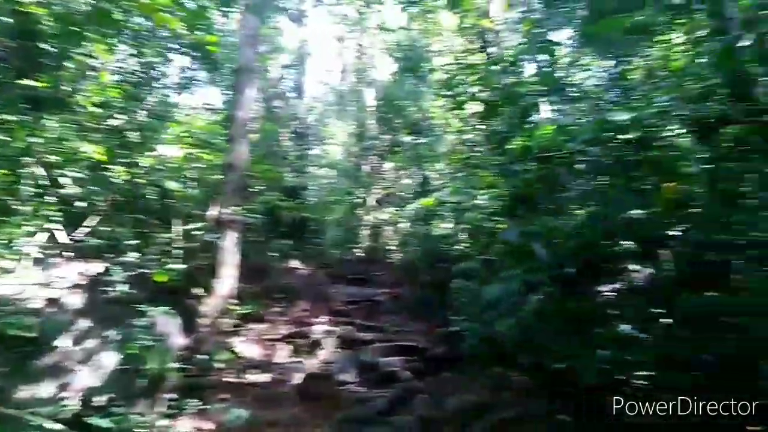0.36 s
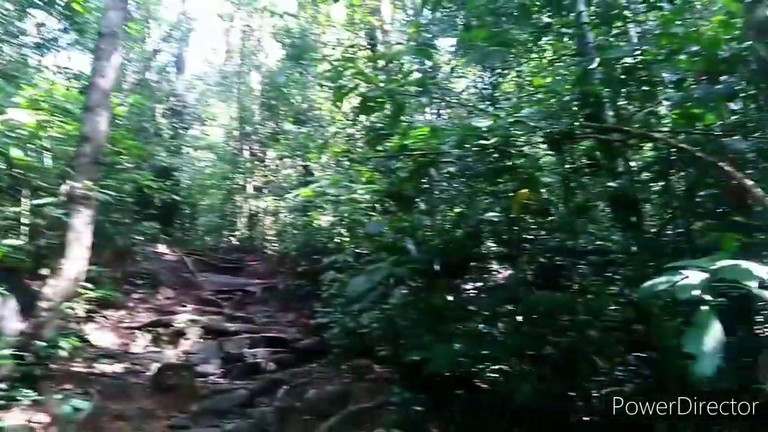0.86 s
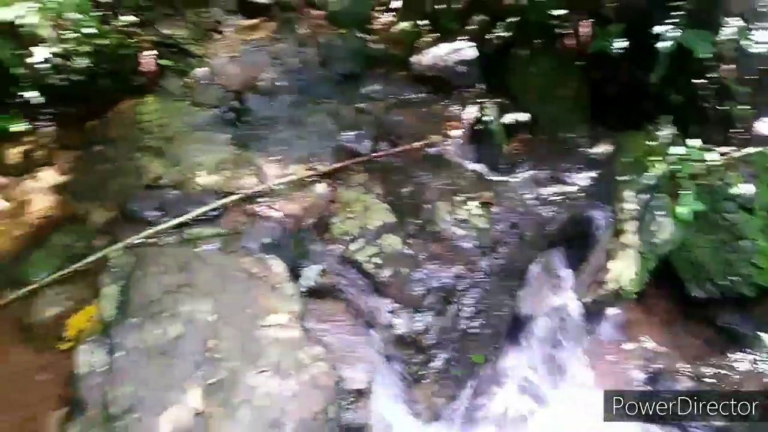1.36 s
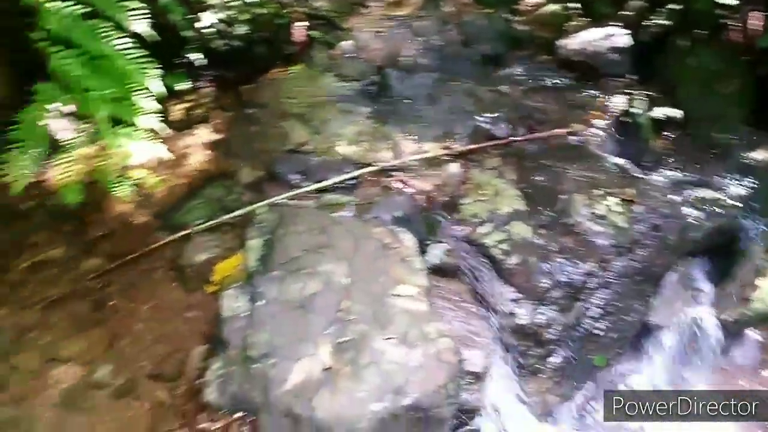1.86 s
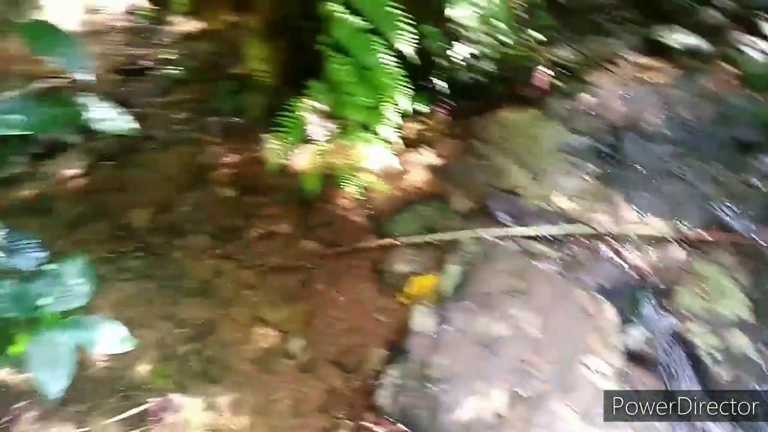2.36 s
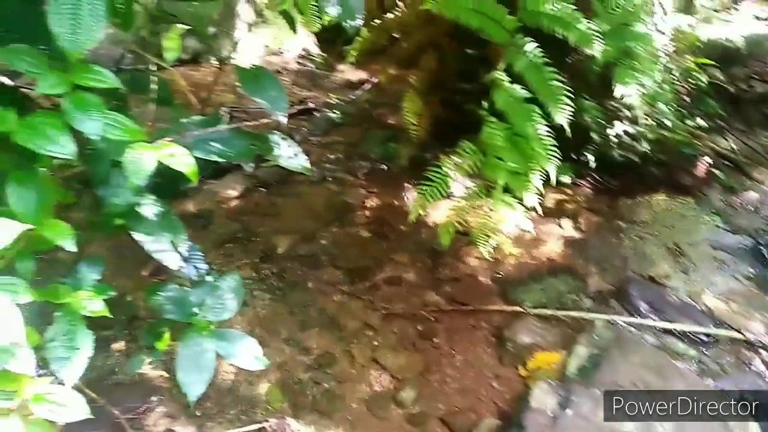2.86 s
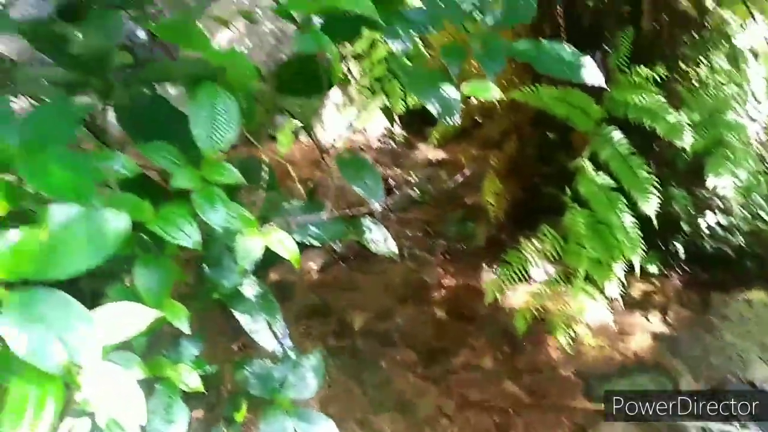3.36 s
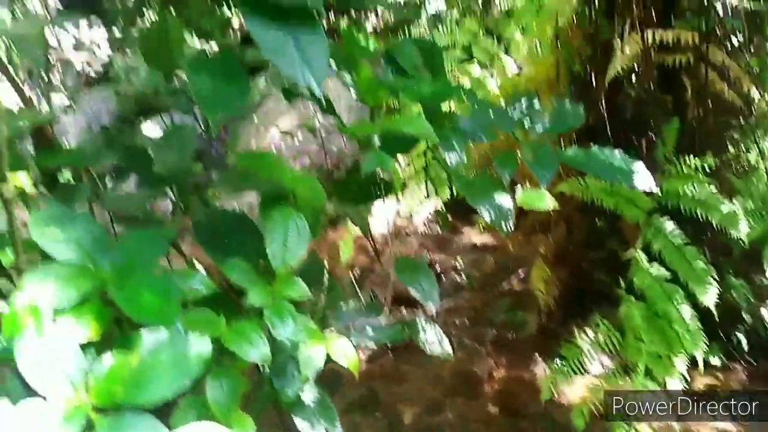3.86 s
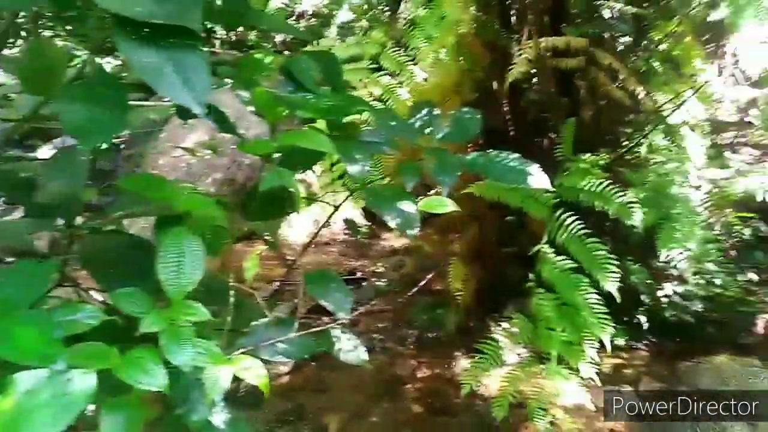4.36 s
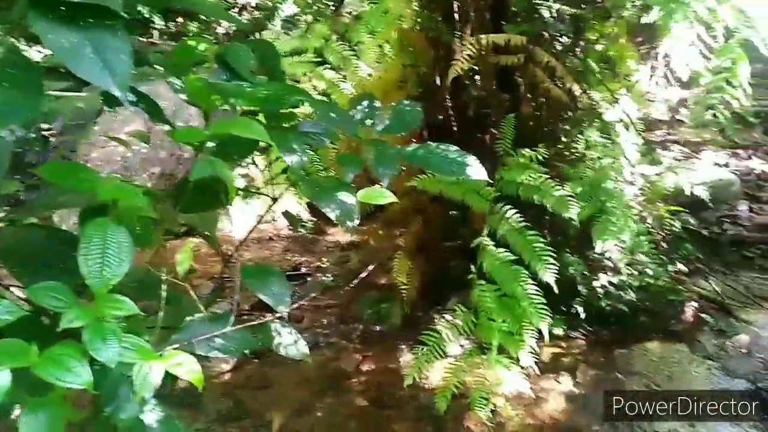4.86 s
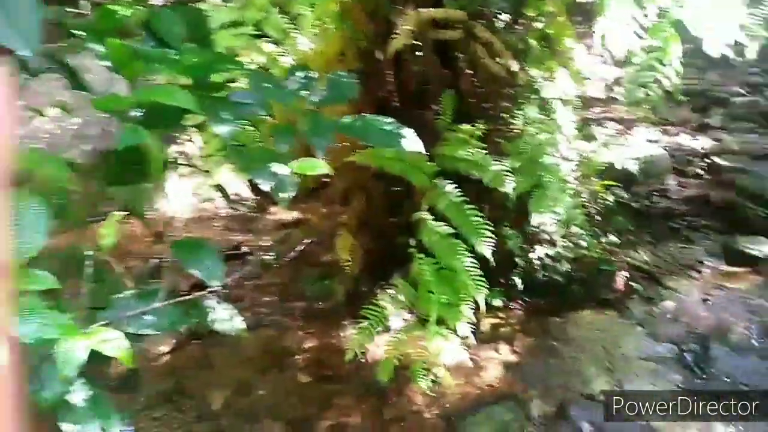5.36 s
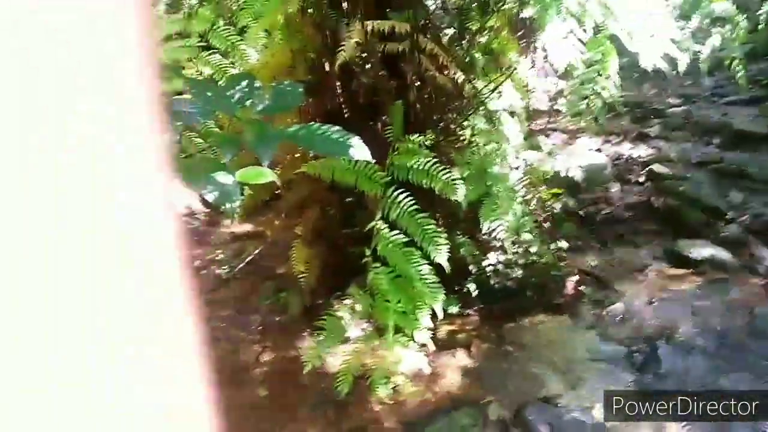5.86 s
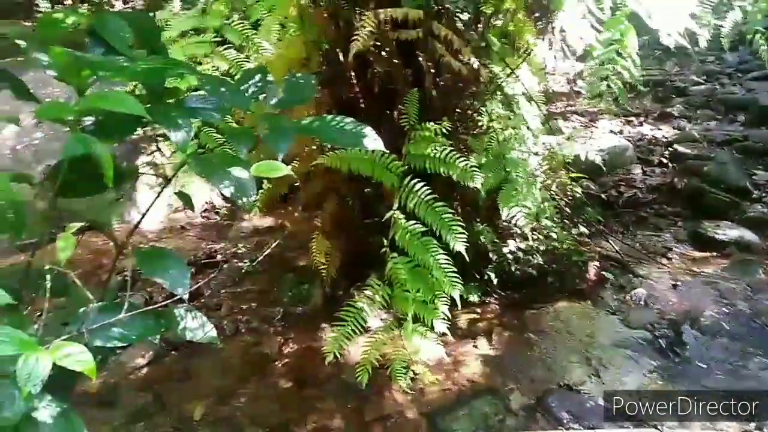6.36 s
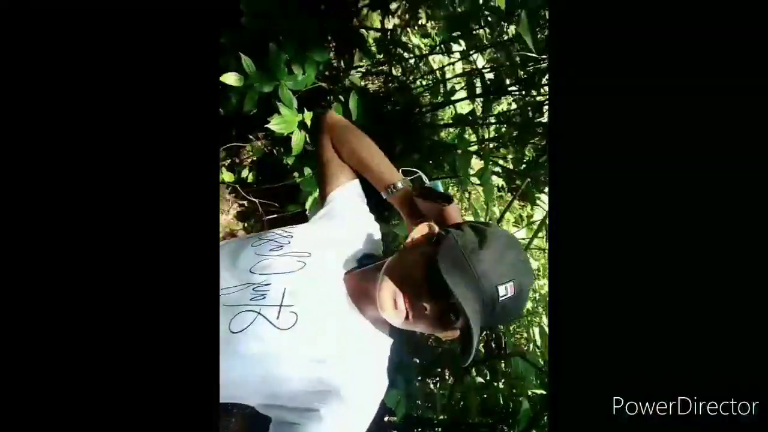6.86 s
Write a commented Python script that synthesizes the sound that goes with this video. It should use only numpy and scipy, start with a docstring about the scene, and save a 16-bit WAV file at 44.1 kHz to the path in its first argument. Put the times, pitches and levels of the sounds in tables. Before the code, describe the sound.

Forest stream heard from three spots: faint steady rush, close splashing and bubbling that gradually dulls and softens, then a short full burst of water.

```python
"""A rocky forest stream, heard through a hand-held device with two microphone ports, from three places in turn:
far off, close to a small fall while the hand turns away from it, and last in mono. Short silences part them.
The rush is noise and tiny clicks in many pitch bands. Near the fall, trapped air gurgles in hollows and single
bubbles ring. Fingers bump and tick on the case near the left port: low tones that fade quickly and short
bursts of noise."""
import sys
import numpy as np
from scipy import signal
from scipy.io import wavfile
from scipy.ndimage import map_coordinates

SR = 44100
rng = np.random.default_rng(int(sys.argv[2]) if len(sys.argv) > 2 else 0)


def to_wav(sig):
    """Store sig (one row per channel, or 1-D mono) as 16-bit WAV at the path in sys.argv[1].

    Samples outside -1..1 are clipped; the rate is SR.
    """
    pcm = np.clip(np.atleast_2d(sig), -1, 1) * 32767
    pcm = np.round(pcm).astype(np.int16)
    wavfile.write(sys.argv[1], SR, pcm.T)  # frames by channels


def gain_from_decibels(decibels):
    """Convert decibel values to linear amplitude factors."""
    exponent = np.asarray(decibels, float) / 20
    return 10 ** exponent


N = 308259

# the near place over time: start_s, level_db (of the rush), facing (1 = towards the fall, 0 = away)
NEAR_PLACE = [(1.159, -25.5, 1), (1.75, -25.5, 0.71), (2.0, -27, 0.76), (2.5, -27.5, 0.51),
              (2.75, -27.5, 0.31), (3.25, -29, 0.22), (3.6, -29.5, 0.25), (4.6, -30, 0.088),
              (5.0, -29.5, 0.16), (6.1, -29, 0.2), (6.4, -28.5, 0.24), (6.663, -28.5, 0.16)]
# how late the right port hears the near water: (ms when facing, ms when turned away)
NEAR_LAG_MS = (0.081, 0.34)


def rms_one(x):
    """Scales a sound to an average strength (rms) of 1."""
    return x / np.sqrt(np.mean(x ** 2) + 1e-20)


def at_hz(points, hz, axis=1):
    """Reads a table column at any pitch, along a logarithmic pitch scale."""
    points = np.array(points)
    return np.interp(np.log(hz), np.log(points[:, 0]), points[:, axis])


def by_facing(ends, facing):
    """Between the value when facing the fall and the value when turned away."""
    faced, away = ends
    return away + facing * (faced - away)


def drift(rate_hz, size):
    """Slow chance: noise at every 40th sample through a double one-pole low-pass; spread 1."""
    r = np.exp(-80 * np.pi * rate_hz / SR)
    noise = rng.standard_normal(size // 40 + 2002)
    slow = signal.lfilter([1], [1, -2 * r, r * r], noise)[2000:]   # skip the filter's start
    return np.interp(np.arange(size) / 40, np.arange(len(slow)), rms_one(slow))


def resonance(x, hz, width_hz):
    """Something that rings at one pitch: a band-pass of gain 1 at its top."""
    r = np.exp(-np.pi * width_hz / SR)
    ringing = [1, -2 * r * np.cos(2 * np.pi * hz / SR), r * r]
    return signal.lfilter((1 - r * r) / 2 * np.array([1, 0, -1]), ringing, x)


def lagged(x, lag_ms):
    """The same sound a fraction of a millisecond later."""
    return map_coordinates(x, [np.arange(len(x)) - lag_ms * SR / 1000], order=3, mode="nearest")


def fade_in_db(t, start_s):
    """The near place swells up from 20 dB down, most of it within a few tenths of a second."""
    return -20 * np.exp(-(np.maximum(t - start_s, 0) / 0.1) ** 0.99)


def spray(size, grain, per_s, spread_db):
    """Hiss mixed with the clicks of bursting bubbles; two unrelated streams for the direct sound and each port."""
    shape = (2, 3, size)
    happens = rng.random(shape) < per_s / SR
    clicks = happens * rng.standard_normal(shape) * gain_from_decibels(spread_db * rng.standard_normal(shape))
    grain = np.clip(grain, 0, 1)     # share of the power that is clicks
    return np.sqrt(1 - grain) * rng.standard_normal(shape) + np.sqrt(grain) * rms_one(clicks)


def port(x, cavity, facing):
    """The cavity behind the port resonates: each of its modes lifts or weakens its band."""
    for hz, width_hz, faced_db, away_db in cavity:
        lift = gain_from_decibels(by_facing((faced_db, away_db), facing)) - 1
        x = x + lift * resonance(x, hz, width_hz)
    return x


def stream(place, faced, behind, cavity, top_hz, lag_ms, grain, surge_db, patchy_db, mono=False, fades=False):
    """Quarter-octave bands of spray, each like bubbles of one size, heard at both ports."""
    # share of the power reaching both ports alike, before the waver: pitch_hz, share_faced, share_away
    alike_table = [(60, .85, 0.92), (250, 0.99, 0.99), (400, .9, 1), (630, 0.5, 0.1), (1000, .5, 0.62),
                   (1260, .4, 0.17), (1490, 0.52, 0.94), (1754, 0.6, 0.78), (2100, .3, 0.34),
                   (4000, 0.12, 0.26), (6000, 0, 0), (14000, 0.02, 0)]
    s, *columns = np.transpose(place)
    start_s, end_s = s[0], s[-1]
    t = np.arange(round((start_s - .05) * SR), round((end_s + .05) * SR)) / SR
    level_db, facing = [np.interp(t, s, c) for c in columns]
    facing = np.clip(facing, 0, 1)
    fade_db = fades * fade_in_db(t, start_s)
    source = spray(len(t), grain, per_s=2500, spread_db=5.0)
    surge = surge_db * drift(27.0, len(t))       # all bands swell together
    splash = splashes(t)
    # the likeness and the lag waver by chance, separately
    waver = gain_from_decibels(6 * drift(3, len(t)))
    edges = 36 * 2 ** np.arange(0, 8.8, .25)
    bands = 0
    for k, (low, high) in enumerate(zip(edges, edges[1:])):
        hz = np.sqrt(low * high)
        colour_db = by_facing((at_hz(faced, hz), at_hz(behind, hz)), facing)
        # splashes act mostly on the highs; the lows fade in from further down
        tilt_db = (splash * hz + 1500 * 0.4 * fade_db) / (hz + 1500)
        gain = gain_from_decibels(colour_db + surge + tilt_db + patchy_db * drift(26.0, len(t)))
        alike = by_facing((at_hz(alike_table, hz), at_hz(alike_table, hz, axis=2)), facing)
        alike = np.clip(alike, 0, 1) ** waver
        shares = np.sqrt([alike, 1 - alike, 1 - alike])
        band_pass = signal.butter(2, [low, high], "band", fs=SR, output="sos")
        # neighbouring bands take unrelated streams
        bands = bands + gain * shares * signal.sosfilt(band_pass, source[k % 2])
    direct, own_left, own_right = bands
    late = lagged(direct, by_facing(lag_ms, facing) * (1 + 0.06 * drift(3, len(t))))
    pair = [port(direct + own_left, cavity, facing), late + own_right]
    pair = np.array([signal.sosfilt(signal.cheby2(18, 60, hz, fs=SR, output="sos"), x)
                     for x, hz in zip(pair, top_hz)])
    pair = pair[[0, 0]] if mono else pair       # in mono the left port feeds both channels
    # the sound starts at once; at its end it drops 29 dB at once, then fades 5.5 dB per ms
    after_ms = np.maximum(t - end_s, 0) * 1000
    gate = (t >= start_s) * gain_from_decibels((after_ms > 0) * (-29 - 5.5 * after_ms))
    pair = pair / np.std(pair.mean(axis=0)) * gain_from_decibels(level_db + fade_db) * gate
    at = np.round(t * SR).astype(int)
    inside, out = (at >= 0) & (at < N), np.zeros((2, N))
    out[:, at[inside]] = pair[:, inside]
    return out


def gurgle():
    """Air trapped in hollows of the rock: bubbles burst there at random and ring each hollow at its own pitch."""
    # hollows under the fall: pitch_hz, width_hz (of each of two passes), bubbles_per_s, left_db (added at left)
    hollow_table = [(289, 160, 500, -1.5), (651, 310, 900, -2.5), (888, 200, 450, 3), (1001, 160, 570, 3.5)]
    # gurgle of each hollow: faced_db, away_db (before left_db, wavering and fade), waver_db (random spread),
    # lag_share (of the port lag, 1 = all), alike_share (of the amplitude, 0-1)
    gurgle_table = [(-41, -43.5, 2, .3, 0.96), (-41, -41, 4.5, 0.96, 0.62), (-46, -53.5, 2.5, 1.05, 0.79),
                    (-43, -52.5, 4.5, 1.3, .7)]
    t, (s, _, facing), out = np.arange(N) / SR, np.transpose(NEAR_PLACE), 0
    facing = np.clip(np.interp(t, s, facing), 0, 1)
    # the hand shades the hollows fully below facing 0.2, and not at all above 0.63
    seen = np.clip((facing - 0.2) / (0.63 - 0.2), 0, 1)
    for hollow, voice in zip(hollow_table, gurgle_table):
        hz, width_hz, per_s, left_db = hollow
        faced_db, away_db, waver_db, lag_share, alike = voice
        bursts = (rng.random((2, N)) < per_s / SR) * rng.standard_normal((2, N)) + 1e-18
        shared, own = (rms_one(resonance(resonance(x, hz, width_hz), hz, width_hz)) for x in bursts)
        late = lagged(shared, lag_share * by_facing(NEAR_LAG_MS, facing))
        right = 0.69 * (alike * late + np.sqrt(max(1 - alike ** 2, 0)) * own)
        pair = np.array([gain_from_decibels(left_db) * shared, right])
        waver = waver_db * np.minimum(drift(8.0, N), 1.5)    # comes and goes, with capped peaks
        out = out + pair * gain_from_decibels(by_facing((faced_db, away_db), seen) + waver)
    # fades in from further down than the rush
    return out * gain_from_decibels(1.43 * fade_in_db(t, s[0])) * (t >= s[0]) * (t <= s[-1])


def drops():
    """Single bubbles near the surface ring briefly, rising in pitch."""
    per_s, low_hz, high_hz, cycles = 70, 250, 2400, 22    # cycles: ring length, counted at the starting pitch
    t, (s, level_db, facing), out = np.arange(N) / SR, np.transpose(NEAR_PLACE), np.zeros(N + SR)
    length_s = s[-1] - s[0]
    for when, pitch, size in rng.random((round(per_s * length_s), 3)):
        hz = low_hz * (high_hz / low_hz) ** pitch
        cycle = np.arange(round(cycles / hz * SR)) * hz / SR
        envelope = (1 - np.exp(-cycle)) * gain_from_decibels(-40 * cycle / cycles)
        # the pitch ends 40 % higher than it starts
        ring = envelope * np.sin(2 * np.pi * cycle * (1 + 0.2 * cycle / cycles))
        at = round((s[0] + when * length_s) * SR)
        out[at:at + len(ring)] += gain_from_decibels(-34 - 3 * np.log(1 - .95 * size)) * ring    # a few are much louder
    out = out[:N] * gain_from_decibels(np.interp(t, s, level_db - level_db.max()) + fade_in_db(t, s[0])) * (t <= s[-1])
    return np.array([out, 0.63 * lagged(out, by_facing(NEAR_LAG_MS, np.interp(t, s, facing)))])


def splashes(t):
    """A splash changes the rush at once, mostly lifting it, and then the change fades away."""
    # splashes at the fall: start_s, rise_db (nearly full for high pitches, less for low; negative = a dip),
    # length_ms (time for the change to shrink to about a third)
    splash_table = [(1.608, -2, 7.2), (1.958, 10, 13), (2.05, 2.5, 4.9), (2.505, 0, 4.9), (2.92, 0, 6.3),
                    (3.243, 8.5, 11), (3.323, -2, 5.1)]
    return sum(db * (t > s) * np.exp(-np.maximum(t - s, 0) * 1000 / ms) for s, db, ms in splash_table)


def fingers():
    """A bump swings the left membrane, a knock is a short mid-range snap, a tick rings the port cavity."""
    # bumps of the hand on the case: start_s, height (signed, before softening and filter), pitch_hz,
    # fall_ms (time to fall 60 dB)
    bump_table = [(4.151, 0.23, 170, 38), (4.157, -0.38, 155, 45), (4.317, -0.25, 145, 33),
                  (6.551, -0.26, 200, 21)]
    # fingernail contacts: start_s, knock_db and tick_db (gains ahead of the last filter), tick_hz,
    # fall_ms (time for the noise that drives both to fall 60 dB)
    tick_table = [(4.1578, -14, -3, 4300, 18), (4.1585, -20, -9, 5700, 12), (4.1622, -26, -11, 5800, 25),
                  (4.4020, -45, -2.5, 4200, 12), (6.556, -31, -15, 4250, 12)]
    tick_width_hz = 750      # of each of two passes
    out, t = np.zeros(N), np.arange(round(.1 * SR)) / SR
    soft = 1 - np.exp(-t / .002)       # flesh meets the case softly
    for s, height, hz, ms in bump_table:
        at = round(s * SR)
        out[at:at + len(t)] += height * soft * gain_from_decibels(-60000 * t / ms) * np.sin(2 * np.pi * hz * t)
    for s, knock_db, tick_db, hz, ms in tick_table:
        snap = gain_from_decibels(-60000 * t / ms) * rng.standard_normal((2, len(t)))
        snap = snap + 9 * (t < .00004)       # led by the first hard contact
        knock = gain_from_decibels(knock_db) * resonance(snap[0], 850, 1100)
        tick = gain_from_decibels(tick_db) * resonance(resonance(snap[1], hz, tick_width_hz), hz, tick_width_hz)
        at = round(s * SR)
        out[at:at + len(t)] += knock + tick
    return signal.sosfilt(signal.butter(2, [35, 7000], "band", fs=SR, output="sos"), out)


def scene():
    """Three places one after another, and the hand, which the right port hears 40 dB softer."""
    # the other two places over time: start_s, level_db, facing (1 = towards the water, 0 = away)
    far_place, last_place = [(0.0, -37.5, 0.6), (1.124, -38, 0.52)], [(6.763, -27.5, 0.88), (6.99, -28, 1)]
    # colour of the water at the open right port: pitch_hz, level_db (per Hz; only the balance counts)
    far_water, last_water = [(40, -92), (70, -71), (200, -74.5), (500, -72.5), (1000, -71), (2200, -74.5),
                             (3500, -76.5), (6000, -76), (8500, -82.5), (11000, -86.5)], [(40, -97), (70, -72), (200, -66.5), (310, -63.5),
                                                (480, -70), (700, -63.5), (1000, -64), (2200, -62),
                                                (3500, -66.5), (6000, -65.5), (8500, -70), (10500, -73),
                                                (12500, -81), (14000, -90)]
    fall_faced, fall_behind = [(40, -81), (70, -78), (110, -69), (200, -71.5), (310, -78), (480, -77),
                               (1000, -68.5), (1500, -68.5), (2200, -71.5), (3500, -70), (6000, -71),
                               (8500, -73), (10500, -83.5), (12500, -81.5), (14000, -81)], [(40, -85), (70, -73.5), (110, -67), (200, -65.5),
                                                   (310, -66), (480, -70.5), (1000, -69.5), (1500, -65.5),
                                                   (2200, -66), (3500, -68), (6000, -69.5), (8500, -73.5),
                                                   (10500, -78.5), (12500, -86), (14000, -100)]
    # cavity behind the left port, changed by the grip: pitch_hz, width_hz, lift_faced_db, lift_away_db
    far_port, near_port, last_port = [(1500, 1700, 2, 1), (5960, 2800, 10.5, 7.5), (9400, 13000, -4, 5.5)], [(1140, 820, 1.5, 4.5), (1700, 920, 2.4, -2.5),
                                                        (2790, 480, 4.5, 1.5), (4050, 720, 16, 10),
                                                        (5520, 900, 0, 2.5), (6230, 1720, 6, 8.5),
                                                        (8920, 1530, -14, -6.5)], [(5760, 850, 8.6, 7)]
    # top_hz: where the treble is cut off (left, right); lag_ms: right port's delay (facing, turned away)
    far = stream(far_place, far_water, far_water, far_port, top_hz=(11300, 9200), lag_ms=(0.32, 0.37),
                 grain=0.018, surge_db=0.07, patchy_db=0.0)
    near = stream(NEAR_PLACE, fall_faced, fall_behind, near_port, top_hz=(12200, 14200), lag_ms=NEAR_LAG_MS,
                  grain=0.2, surge_db=0.52, patchy_db=1.0, fades=True)
    last = stream(last_place, last_water, last_water, last_port, top_hz=(14500, 14800), lag_ms=(0, 0),
                  grain=0.095, surge_db=0.0, patchy_db=1.0, mono=True)
    hand = fingers() * gain_from_decibels([[0], [-40]])
    return far + near + gurgle() + drops() + last + hand


def roll_off(x):
    """The treble ends steeply here."""
    return signal.sosfilt(signal.butter(12, 15050, fs=SR, output="sos"), x)


def record(dry):
    """Sends the finished mix through the last step, which changes it slightly."""
    return roll_off(dry)


dry = scene()
out = record(dry)
to_wav(out)
```